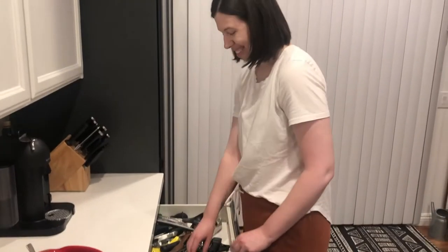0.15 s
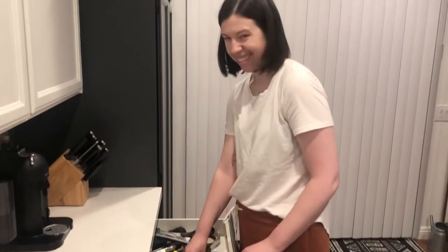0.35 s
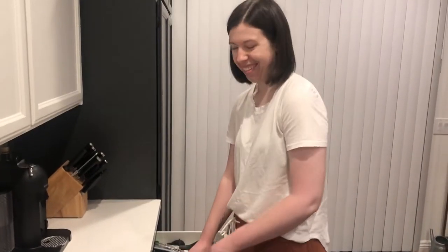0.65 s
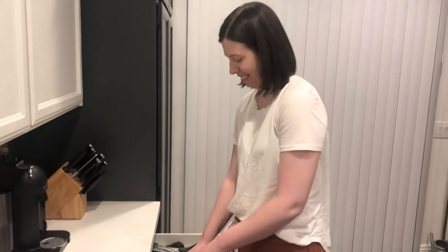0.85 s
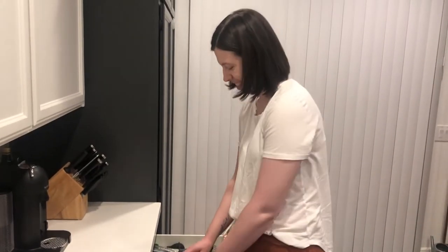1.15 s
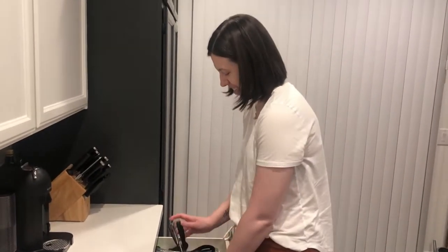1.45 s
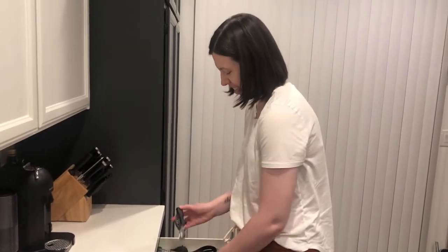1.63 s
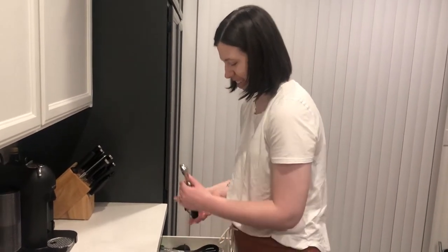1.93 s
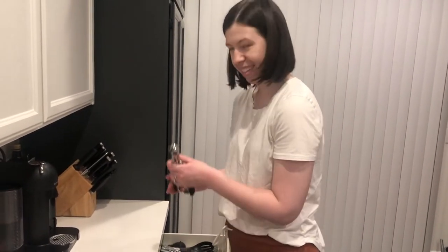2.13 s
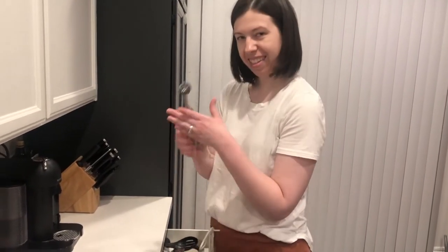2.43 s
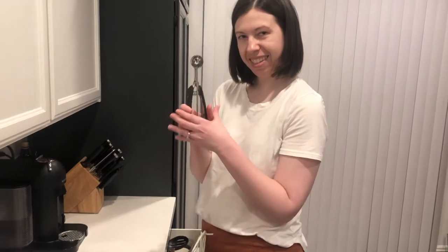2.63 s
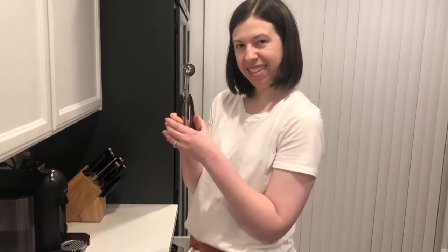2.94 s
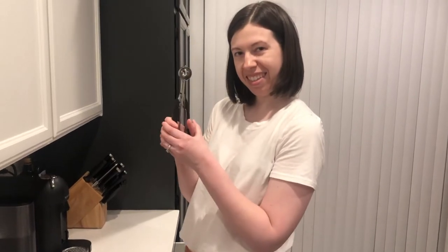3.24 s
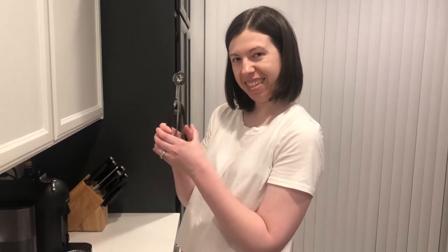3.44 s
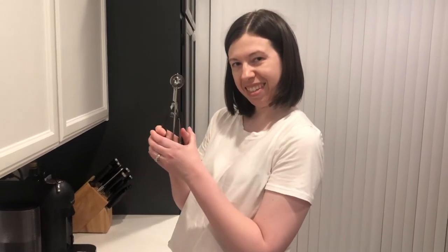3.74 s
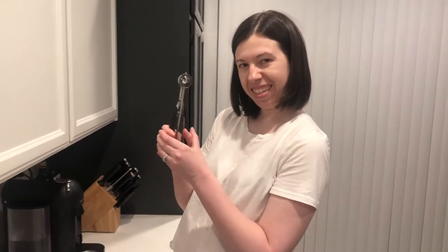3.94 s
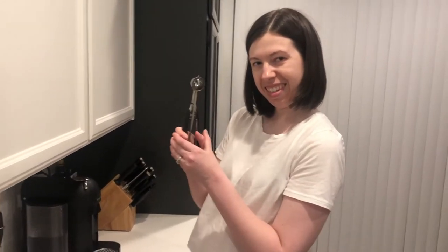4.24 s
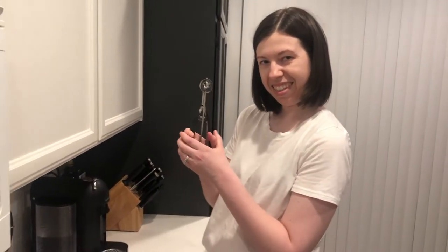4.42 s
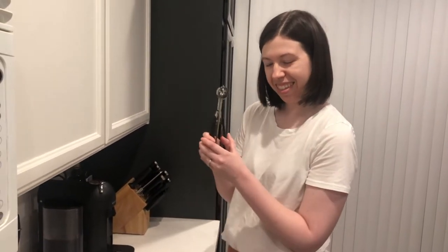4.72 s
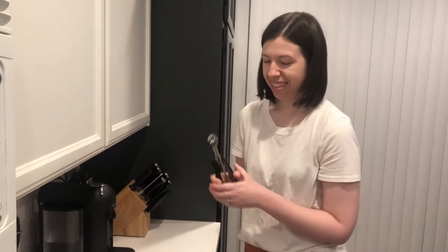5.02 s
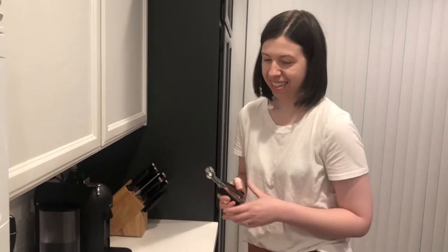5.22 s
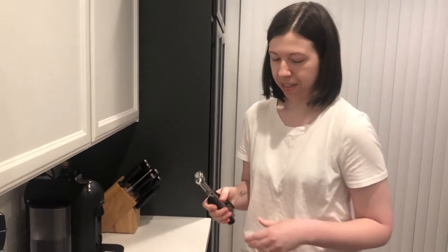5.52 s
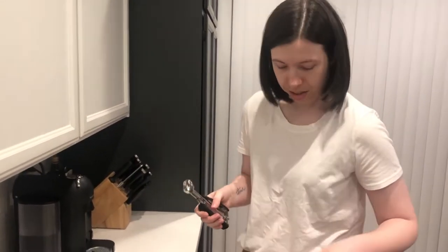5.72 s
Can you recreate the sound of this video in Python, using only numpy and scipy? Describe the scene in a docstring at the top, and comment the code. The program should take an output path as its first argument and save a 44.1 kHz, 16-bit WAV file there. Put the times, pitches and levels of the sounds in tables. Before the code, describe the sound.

In a hard-walled kitchen, heard from nearby, someone rummages among metal utensils and pushes the wooden drawer shut with a bang and a crash of cutlery. Clothes rustle faintly as a handle clacks in the hand. Then a steel scoop rasps and snaps in a quick run of about twelve squeezes, with a single hollow knock midway. A few faint ticks follow over a very quiet hum.

```python
"""Kitchen drawer and steel scoop

Utensils clink and bump in a wooden drawer, which rolls shut with a loud clank: impacts excite damped modes.
Clothes rustle and a spring-loaded scoop is squeezed a dozen times: its gear rasps, its blade snaps home.
One dull knock falls among the squeezes. The hard-walled kitchen reverberates over a faint appliance hum."""
import sys
import numpy as np
from scipy import signal
from scipy.fft import rfft, irfft, next_fast_len
from scipy.io import wavfile
from scipy.ndimage import map_coordinates

SR = 44100
rng = np.random.default_rng(int(sys.argv[2]) if len(sys.argv) > 2 else 0)


def materialize(psi):
    """Save the field psi as 16-bit PCM at rate SR to the path in sys.argv[1].

    A 1-D psi becomes a single channel; in a 2-D psi each row is a channel.
    """
    bounded = np.clip(np.atleast_2d(psi).T, -1, 1)
    quanta = np.round(bounded * 32767).astype(np.int16)
    wavfile.write(sys.argv[1], SR, quanta)


N = 258922
CLOCK = np.arange(N) / SR  # scene time, s
T = np.arange(int(.6 * SR)) / SR  # time since an impact, s
TOP_HZ = 16150


def amp(db):
    """Amplitude ratio of a level in decibels."""
    return 10 ** (np.asarray(db) / 20)


def unit(x):
    """Normalisation to rms 1."""
    return x / np.sqrt(np.mean(x ** 2) + 1e-20)


def along(points, hz):
    """Interpolation of (frequency_hz, value) points on a logarithmic frequency axis."""
    f, v = np.transpose(points)
    return np.interp(np.log(hz + 1), np.log(f + 1), v)


def wobble(rate):
    """Random modulation: a smooth curve through rate knots a second."""
    return map_coordinates(rng.standard_normal(int(N * rate / SR) + 4), [CLOCK * rate])


def colour(x, spectrum):
    """Spectral shaping: x filtered by a gain curve, at rms 1."""
    size = next_fast_len(len(x))
    gain = amp(along(spectrum, np.fft.rfftfreq(size, 1 / SR)))
    return unit(irfft(rfft(x, size) * gain, size)[:len(x)])


def noise(spectrum):
    """Coloured Gaussian noise of rms 1."""
    return colour(rng.standard_normal(N), spectrum)


def fade(t60):
    """Exponential decay: 60 dB in t60 seconds."""
    return np.exp(-np.log(1000) * T / t60)


def rise(attack):
    """Exponential onset with a time constant in seconds."""
    return 1 - np.exp(-T / attack)


def held(start, end, attack, release):
    """Trapezoidal envelope, at 1 from start to end."""
    return np.interp(CLOCK, [start - attack, start, end, end + release], [0, 1, 1, 0])


def burst(spectrum, t60, attack):
    """High modal density: countless modes struck at once merge into decaying noise."""
    envelope = rise(attack) * fade(t60)
    bins = rfft(rng.standard_normal(len(T)) * envelope)
    white = irfft(bins / np.abs(bins), len(T))
    x = colour(white, spectrum) * rise(attack) * fade(4 * t60)
    return x * np.linalg.norm(envelope) / np.linalg.norm(x)


def ring(modes):
    """Modal superposition: damped sinusoids, their strengths varying a little at each strike."""
    hz, db, t60 = np.transpose(modes)[:, :, None]
    gain = amp(db + rng.standard_normal(db.shape))
    partials = gain * np.sin(2 * np.pi * hz * T) * fade(t60)
    return np.sum(partials, axis=0) / np.sqrt(np.sum(amp(db) ** 2) / 2)


def add(track, s, sound):
    """Linear superposition of a sound at time s."""
    part = track[max(round(s * SR), 0):][:len(sound)]
    part += sound[:len(part)]


# still air: frequency_hz, gain_db
AIR_SPECTRUM = [(15, -52), (25, -39), (48, -17), (70, -20), (87, -12), (161, -10.5), (195, -4), (344, -12),
                (677, -20), (840, -20.5), (1040, -19.5), (1130, -23.5), (1610, -27.5), (2050, -29),
                (16000, -48)]
# appliance tones: pitch_hz, level_db
HUM_LINES = [(58.6, -72), (48.3, -79), (208, -73), (1036, -81)]
def background():
    """Line spectrum over a noise floor: an appliance hums, wavering in level and phase."""
    hum = sum(amp(db + wobble(8)) * np.sqrt(2) * np.sin(2 * np.pi * hz * CLOCK + .5 * wobble(8))
              for hz, db in HUM_LINES)
    return amp(-65) * noise(AIR_SPECTRUM) + hum


# reverberation time: frequency_hz, t60_s
ROOM_DECAY = [(80, 0.53), (250, 0.5), (700, 0.73), (1600, 0.75), (4000, 0.69), (8000, 0.52), (15000, 0.3)]
def kitchen(x, count=5):
    """Diffuse reverberation: treble dies first, and moving contact points excite changing echoes."""
    shares = np.array([wobble(45) for _ in range(count)])
    out = np.zeros(N)
    for share in shares / np.linalg.norm(shares, axis=0):
        hz, t, bins = signal.stft(rng.standard_normal(len(T)), SR, nperseg=256)
        decay = np.exp(-np.log(1000) * t / along(ROOM_DECAY, hz)[:, None])
        tail = signal.istft(bins * decay, SR, nperseg=256)[1][:len(T)] * rise(.0015)
        add(out, .003, signal.fftconvolve(x * share, tail / np.linalg.norm(tail)))
    return out


# arm movements: middle_s, length_s, sleeve_db, rumble_db
ARM_MOVES = [(2.095, 0.5, -67, -70), (2.293, 0.31, -68.5, -55.5), (2.572, 0.61, -60.5, -60),
             (2.896, 0.65, -75, -60.5), (3.56, 1, -71.5, -63), (4.7, 1.7, -73.5, -75.5),
             (5.442, 0.3, -68.5, -87), (5.792, 1.3, -72, -73)]
# the handle clacks in the hand: start_s, level_db
HANDLE_TAPS = [(2.439, -42), (2.489, -47), (2.561, -40), (5.447, -55.5)]
# sleeve, hand rumble and clack: frequency_hz, gain_db
SLEEVE_SPECTRUM = [(150, -17.5), (400, 3), (900, -6), (1700, -10), (3000, -14), (6000, -21), (15000, -36)]
RUMBLE_SPECTRUM = [(30, -28), (60, 0), (110, 4), (210, 0), (350, -11), (700, -21), (3000, -63.5)]
TAP_SPECTRUM = [(300, -22), (700, 3.5), (1000, 4.5), (1700, 5.5), (2600, -10), (6500, -13.5), (10000, -61)]
def hands():
    """Friction noise: sleeves rustle and hands rumble with each move; the handle adds brief impacts."""
    middle, length, sleeve_db, rumble_db = np.transpose(ARM_MOVES)
    swells = np.cos(np.pi * np.clip((CLOCK - middle[:, None]) / length[:, None], -.5, .5)) ** 2
    out = np.sqrt(amp(sleeve_db) ** 2 @ swells) * noise(SLEEVE_SPECTRUM) * amp(1.8 * wobble(35) - 1)
    out += np.sqrt(amp(rumble_db) ** 2 @ swells) * noise(RUMBLE_SPECTRUM) * amp(1.7 * wobble(22) - 3)
    for s, db in HANDLE_TAPS:
        add(out, s, amp(db - 8) * burst(TAP_SPECTRUM, t60=.072, attack=.00065))
    return out


# the dull knock: start_s, ring_db, thud_db
KNOCKS = [(3.8378, -36.5, -40)]
# the hollow object and the floor under it: pitch_hz, level_db, t60_s
HOLLOW_MODES = [(315, -7, 0.13), (444, -2, 0.084), (496, -1, 0.15), (756, 1, 0.049), (800.4, -4, 0.19),
                (1164, 0.5, 0.14), (1220, -3, 0.11), (1250, -9, 0.21), (1490, -3, 0.033), (1830, -8, 0.067)]
FLOOR_MODES = [(61, -9.5, 0.7), (75.4, 4, 0.47), (114, -4, 0.41)]
# the knock's noise: frequency_hz, gain_db
KNOCK_SPECTRUM = [(100, 1.5), (300, 5), (500, -6.5), (900, -4), (1300, -5.5), (1900, -12), (3500, -18.5),
                  (8000, -39)]
def knock():
    """Resonance and beating: something hollow rings, then the floor's close modes throb."""
    out = np.zeros(N)
    for s, ring_db, thud_db in KNOCKS:
        hollow = ring(HOLLOW_MODES) * rise(.00032)
        impact = amp(-3.5) * burst(KNOCK_SPECTRUM, t60=.26, attack=.00034)
        add(out, s, amp(ring_db) * (hollow + impact))
        add(out, s, amp(thud_db) * ring(FLOOR_MODES) * rise(.034))
    return out


# steel meets steel: clash_s, level_db, pitch_hz, cluster_db, graze_lead_s
STEEL_CLINKS = [(0.256, -46, 15000, -22, 0.0039), (0.420, -44.5, 8000, -20, .0125),
                (0.460, -35.5, 6100, -15, 0.0018), (0.653, -41.5, 6900, -14.5, 0.011),
                (0.8533, -36.5, 11900, -21, 0.0073), (0.8942, -41.5, 8050, -30, 0.0028),
                (2.558, -45.5, 6450, -7, 0.00067)]
# steel contact: frequency_hz, gain_db
STEEL_SPECTRUM = [(800, -24), (2500, -7), (4000, 1.5), (6500, -0.5), (9000, -7), (13000, -7), (15500, -9)]
# cutlery: pitch_hz, level_db, t60_s
CUTLERY_MODES = [(3700, -12, .5), (6200, -3, 0.69), (6900, -1, 0.23), (7300, -3.5, .4), (12100, -16, .35),
                 (15100, 2, .27)]
def utensils():
    """Impact excitation: a graze, then a clash rings close partials, damped by the pile."""
    out = np.zeros(N)
    for s, db, hz, cluster_db, lead in STEEL_CLINKS:
        cluster = ring([(hz + offset_hz, 0, .38) for offset_hz in rng.normal(0, 150, size=6)])
        graze = burst(STEEL_SPECTRUM, t60=.06, attack=.00033)
        clash = burst(STEEL_SPECTRUM, t60=.069, attack=.00033)
        ringing = amp(cluster_db - 3.5) * cluster + amp(-25) * ring(CUTLERY_MODES)
        add(out, s - lead, amp(db - 16.5) * graze)
        add(out, s, amp(db - 11.5) * (clash + ringing))
    return out


# the drawer is shoved along: start_s, end_s, level_db
DRAWER_SHOVES = [(0.393, 0.605, -59.5), (0.654, 1.016, -53.5)]
# the wooden box: frequency_hz, gain_db
WOOD_SPECTRUM = [(59, -46.5), (100, -6), (229, -2.5), (315, -6.5), (395, -3.5), (524, -3), (888, -8),
                 (1530, -10), (1920, -16.5), (2280, -18.5), (9000, -43.5), (11700, -57.5), (19800, -120)]
def runners(push_s=.082, growth_db_per_s=98):
    """Rolling noise grows with speed: two shoves, then a push that accelerates into the stop."""
    stop = SLAM_BLOWS[0][0]
    shoves = sum(amp(db) * held(start, end, attack=.047, release=.08) for start, end, db in DRAWER_SHOVES)
    push = amp(-48 - growth_db_per_s * np.abs(stop - CLOCK))
    push *= held(stop - push_s, stop, attack=.0093, release=.012)
    return (shoves + push) * noise(WOOD_SPECTRUM) * amp(3.4 * wobble(70.13))


# things bump the drawer: start_s, level_db, bass_db, rebound_loss_db
DRAWER_BUMPS = [(0.162, -47, -6, 12), (0.258, -39.5, 1, 11), (0.409, -34, -1, 12), (0.477, -30.5, -9.5, 6),
                (0.629, -33, -16, 9), (0.653, -25.5, -11, 5), (0.766, -30.5, -16.5, 18),
                (0.846, -20.5, -6, 3.5), (5.825, -50.5, 6.5, 17)]
# the box's boom: frequency_hz, gain_db
BOOM_SPECTRUM = [(60, -33), (110, -7.5), (200, -5.5), (280, 0.5), (360, -5), (500, -24), (1500, -49)]
# the box: pitch_hz, level_db, t60_s
BOX_MODES = [(85, -19, 0.21), (117.5, 1, 0.18), (214, -7.5, 0.62), (248.1, 2.5, 0.28), (319, -2.5, 0.33),
             (469, -6, 0.39), (519, -17, 0.83), (551, -12.5, 0.43), (728, -8.5, 0.35), (813, -19, .34),
             (1255, -15.5, 0.78), (1316, -8.5, 0.35), (1630, -18, 0.47), (1940, -15, 0.43)]
def bumps(contacts=3, rebound_s=.0245, hard_db=-22):
    """Inelastic rebound: ever weaker contacts excite the box, its modes damped by the hand."""
    out = np.zeros(N)
    for s, first_db, bass_db, loss_db in DRAWER_BUMPS:
        for k in range(contacts):
            db = first_db - k * loss_db
            attack = .0016 if db > hard_db else .0027  # a hard contact builds faster
            boom = amp(bass_db - 1) * burst(BOOM_SPECTRUM, t60=.22, attack=attack)
            ringing = amp(-9.5) * ring(BOX_MODES) * fade(.27) * rise(attack)
            impact = burst(WOOD_SPECTRUM, t60=.13, attack=attack)
            add(out, s + k * rebound_s, amp(db - 11) * (impact + boom + ringing))
    return out


# the drawer hits its stop and the load follows: start_s, box_db, cutlery_db
SLAM_BLOWS = [(1.2351, -23.5, -25.5), (1.2424, -21, -32), (1.259, -34.5, -46)]
# box and cutlery in the slam: frequency_hz, gain_db
STOP_SPECTRUM = [(25, -61), (55, -39), (85, -18), (115, -4), (160, 1), (250, 3.5), (330, -9.5), (400, -4.5),
                 (520, -2.5), (1300, -7), (2000, -17), (3500, -43), (9000, -38)]
CRASH_SPECTRUM = [(300, -22), (1500, 6.5), (3000, 1.5), (5500, -1), (8000, -5), (12000, -9), (16000, -12.5)]
def slam():
    """Inertia: the box booms against its stop and the loose cutlery crashes inside."""
    out = np.zeros(N)
    for s, box_db, cutlery_db in SLAM_BLOWS:
        add(out, s, amp(box_db) * burst(STOP_SPECTRUM, t60=.17, attack=.0017))
        add(out, s, amp(cutlery_db) * burst(CRASH_SPECTRUM, t60=.16, attack=.00039))
    return out


def panels():
    """Free vibration: the slam's hardest blow leaves the cabinet's panels ringing."""
    out = np.zeros(N)
    s, box_db, _ = max(SLAM_BLOWS, key=lambda blow: blow[1])
    add(out, s, amp(box_db - .5) * ring(BOX_MODES) * rise(.0033))
    return out


# gear teeth scraping: frequency_hz, gain_db
RASP_SPECTRUM = [(500, -19.5), (1400, -4.5), (2000, -8.5), (3200, 1), (5500, 3), (8500, -2), (13000, -1.5),
                 (15600, -3)]
def tooth(middle_hz=6520, spread_octaves=.65):
    """Sudden release: a tooth lets go with a scrape and a ping of two random partials."""
    pitches = np.minimum(middle_hz * 2 ** (spread_octaves * rng.standard_normal(2)), TOP_HZ)
    ping = ring([(hz, 0, .023) for hz in pitches])
    return burst(RASP_SPECTRUM, t60=.0092, attack=.00021) + amp(-6) * ping


# the gear creeps short of the stop: start_s, length_s, level_db
GEAR_CREEPS = [(4.826, 0.014, -44), (5.618, .03, -60.5), (5.827, 0.048, -60.5)]
# squeezes, ending at the blade's stop: stop_s, travel_s, gear_db, swell_db, snap_db
SCOOP_SQUEEZES = [(2.8602, 0.053, -49.5, -2, -29), (3.0683, 0.044, -49, 5, -27),
                  (3.2145, .034, -45, 2.5, -29), (3.398, 0.051, -49, 0, -29.5),
                  (3.5594, 0.041, -48, -1, -27.5), (3.7271, 0.055, -50, -1, -32.5),
                  (3.9013, 0.041, -47, -1.5, -28), (4.0897, .045, -51, -6.5, -29),
                  (4.259, .040, -49.5, 5.5, -25.5), (4.481, 0.045, -51, -6, -28.5),
                  (4.6223, 0.036, -53, -1, -25.5), (4.895, 0.03, -53.5, -7, -30)]
def gear(teeth=10, tooth_s=.008, slack_s=.01, catches_per_s=260):
    """Stick-slip friction: the gear takes up its slack, bites, then rasps from tooth to tooth."""
    catches = (rng.random(N) < catches_per_s / SR) * rng.uniform(.5, 2, N)
    slips = .45 + signal.fftconvolve(catches, fade(.012))[:N]
    rasp = amp(-3.5) * unit(noise(RASP_SPECTRUM) * slips)
    creep = sum(amp(db) * held(s, s + length, attack=.0033, release=.005) for s, length, db in GEAR_CREEPS)
    out = signal.sosfilt(signal.butter(1, 8200, fs=SR, output="sos"), creep * rasp)  # slow creep is duller
    for stop, travel, gear_db, swell_db, _ in SCOOP_SQUEEZES:
        bite = stop - travel
        effort = lambda time: amp(gear_db + swell_db * (np.clip((time - bite) / travel, 0, 1) - .5))
        slack = amp(-11) * held(bite - slack_s, bite, attack=.003, release=.002)
        out += effort(CLOCK) * (slack + held(bite, stop, attack=.0017, release=.0025)) * rasp
        for k, (late, hard) in enumerate(rng.standard_normal((teeth, 2))):
            time = bite + (k + .2 * late) * tooth_s
            db = .5 + 3 * hard if k else 2.5  # a firm first bite, then uneven teeth
            moving = time < stop - tooth_s / 2
            add(out, time, moving * effort(time) * amp(db) * tooth())
    return out


# blade contact and the handle's body: frequency_hz, gain_db
CLICK_SPECTRUM = [(600, -74), (1500, -2.5), (2600, 2), (5000, 4), (7000, 4), (8500, 0.5), (11500, 1.5),
                  (13500, -7), (15600, -3.5)]
BODY_SPECTRUM = [(500, -43), (1000, -29), (1400, 0.5), (2300, -13), (3500, -11), (8000, -37)]
# the scoop's steel: pitch_hz, level_db, t60_s
SCOOP_MODES = [(2035, -4, .2), (2420, 8, 0.2), (3230, -3, 0.25), (4330, -8, 0.17), (5000, -6, 0.19),
               (6300, 6, 0.3), (7700, -12, 0.31), (11600, 5, 0.17), (15360, 5, .2)]
def click(db, body_db, chatter_s):
    """Impulse response of the scoop: a crack, its chatter, the handle's body and a faint ring."""
    crack = burst(CLICK_SPECTRUM, t60=.0055, attack=.0001)
    chatter = amp(-3.5) * burst(CLICK_SPECTRUM, t60=chatter_s, attack=.00017)
    body = amp(body_db + 1.5) * burst(BODY_SPECTRUM, t60=.023, attack=.000065)
    return amp(db - 8) * (crack + chatter + body + amp(-27.5) * ring(SCOOP_MODES))


# the loose blade ticks as the scoop turns: start_s, level_db, body_db
BLADE_TICKS = [(2.003, -49.5, -22), (2.6766, -45.5, 1.5), (5.106, -50.5, -0.5), (5.6425, -50.5, -3)]
# the steel's high zing: frequency_hz, gain_db
ZING_SPECTRUM = [(5000, -40), (10000, -18), (13000, -2), (15500, 4)]
def scoop(middling_db=-29, echo_s=.0051):
    """Nonlinear contact: the harder the blade hits its stop, the brighter and longer it chatters."""
    out = gear()
    for s, *_, db in SCOOP_SQUEEZES:
        extra_db = db - middling_db
        add(out, s, click(db, body_db=-16 - .7 * extra_db, chatter_s=.03 * 2 ** (extra_db / 3)))
        add(out, s, amp(db - 30 + 3 * extra_db) * burst(ZING_SPECTRUM, t60=.035, attack=.0002))
    for s, db, body_db in BLADE_TICKS:
        add(out, s, click(db, body_db, chatter_s=.027))
    reflection = np.pad(out, (round(echo_s * SR), 0))[:N]  # from a hard surface close by
    return out + amp(-11.5) * reflection


def scene():
    """Direct plus reverberant field: the sources excite the room, each with its own share."""
    drawer = runners() + bumps()
    steel, clank, tool, thud, handling = utensils(), slam(), scoop(), knock(), hands()
    direct = drawer + steel + clank + panels() + tool + thud + handling
    send = (amp(-5.5) * drawer + amp(-4.5) * steel + amp(-3.5) * clank
            + amp(-6) * tool + amp(-2.5) * thud + amp(-4.5) * handling)
    return (direct + kitchen(send) + background())[None]


def record(dry):
    """Band limiting: filters remove the deep bass and the treble above TOP_HZ."""
    thin = signal.sosfilt(signal.butter(4, 42, "highpass", fs=SR, output="sos"), dry)
    lowpass = signal.firwin(255, TOP_HZ, fs=SR)
    return signal.fftconvolve(thin, lowpass[None], mode="same", axes=1)


dry = scene()
out = record(dry)
materialize(out)
```